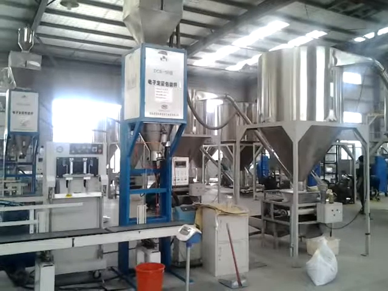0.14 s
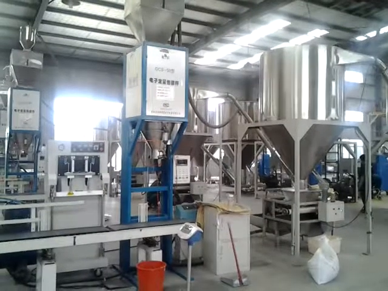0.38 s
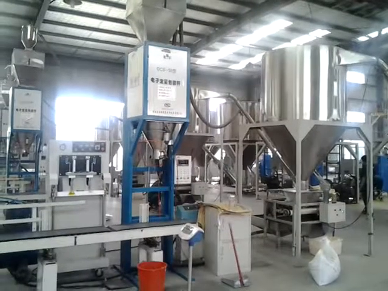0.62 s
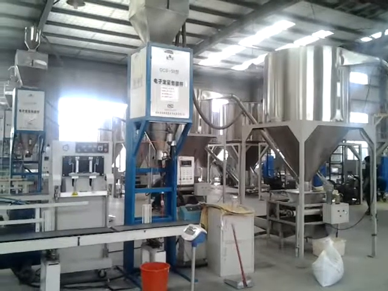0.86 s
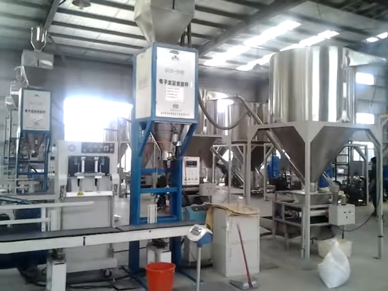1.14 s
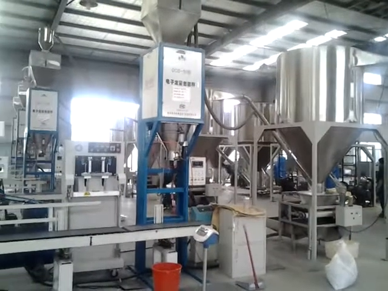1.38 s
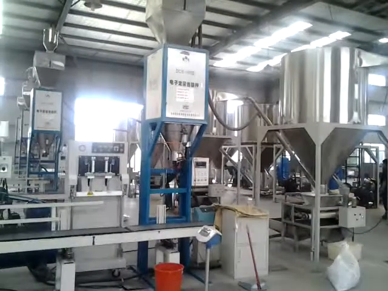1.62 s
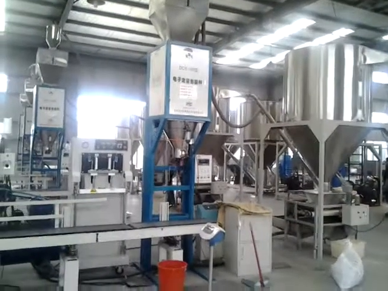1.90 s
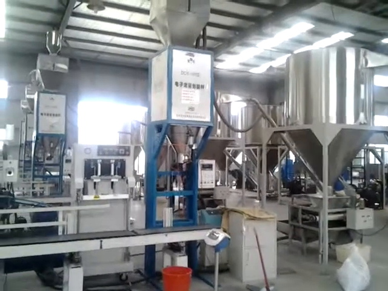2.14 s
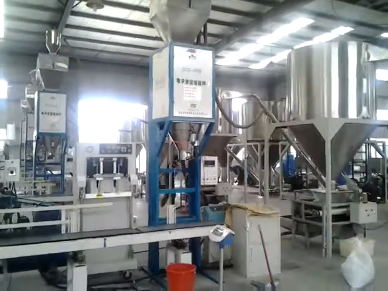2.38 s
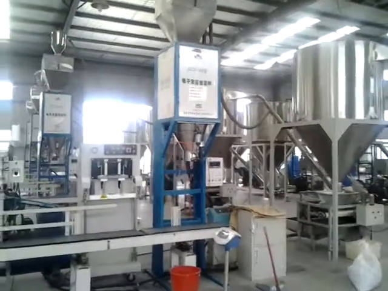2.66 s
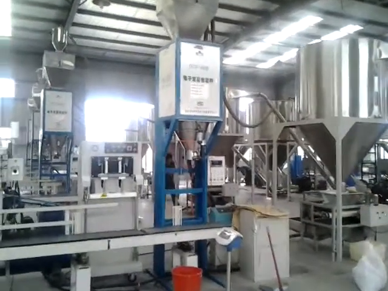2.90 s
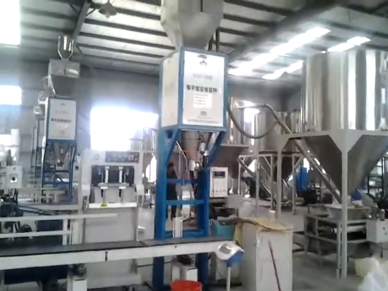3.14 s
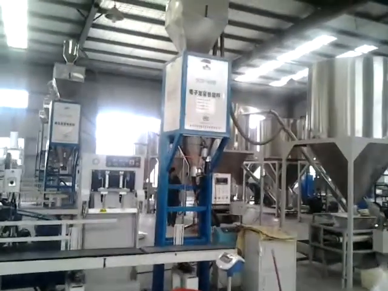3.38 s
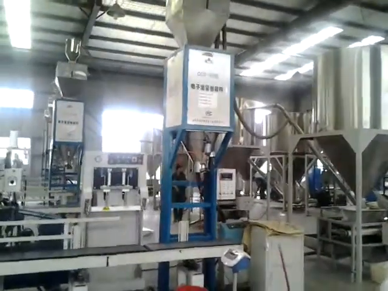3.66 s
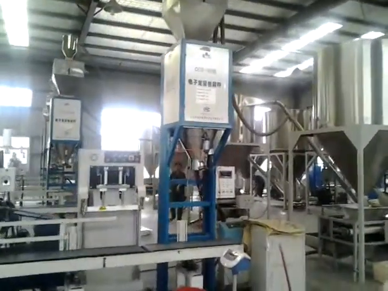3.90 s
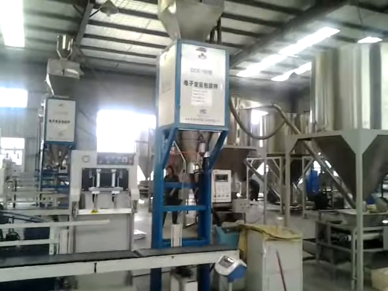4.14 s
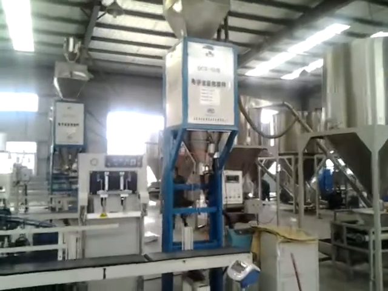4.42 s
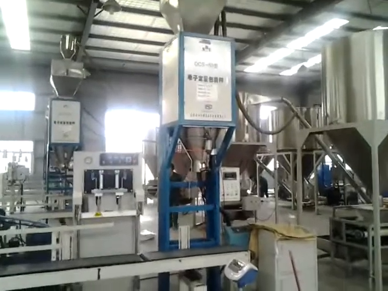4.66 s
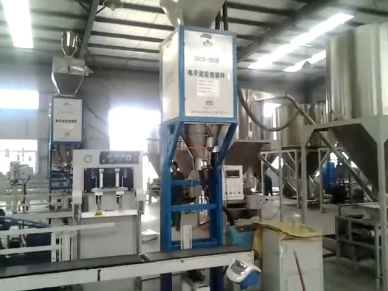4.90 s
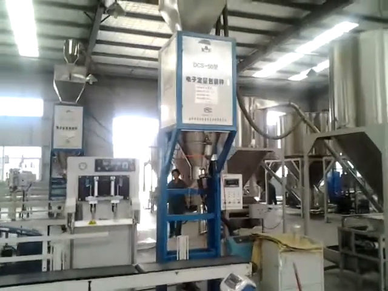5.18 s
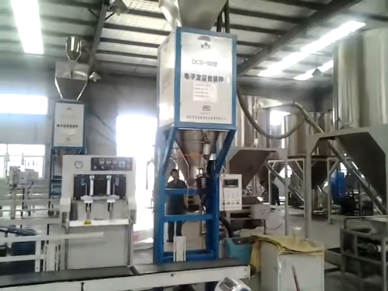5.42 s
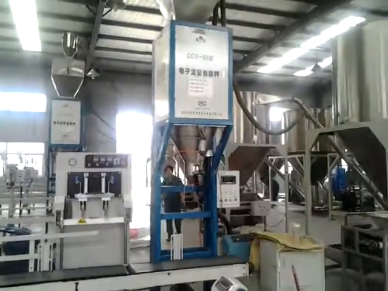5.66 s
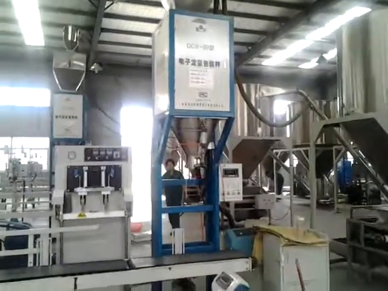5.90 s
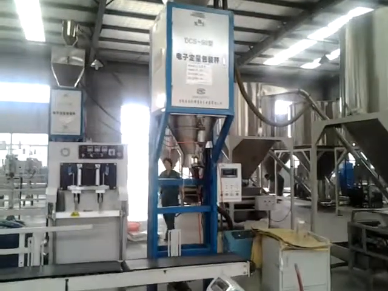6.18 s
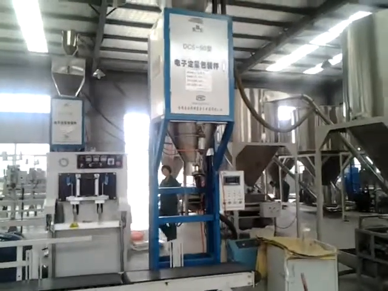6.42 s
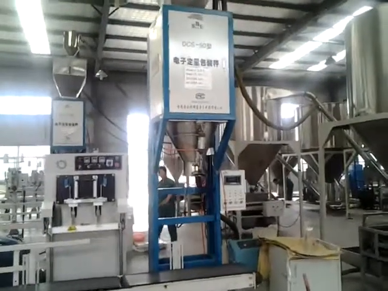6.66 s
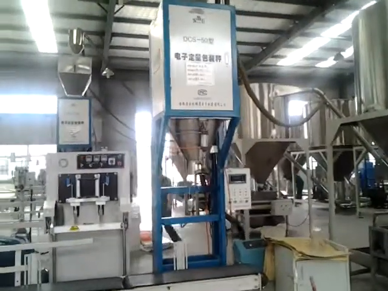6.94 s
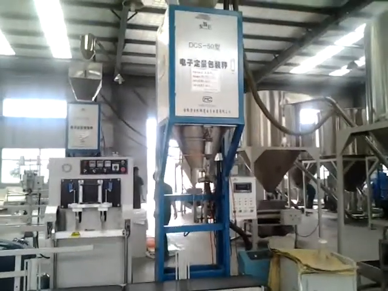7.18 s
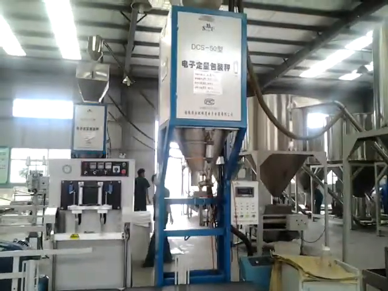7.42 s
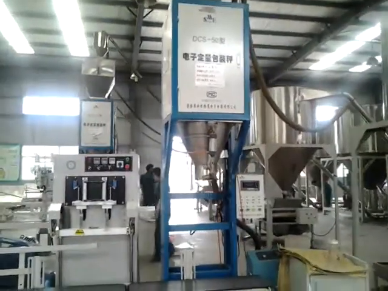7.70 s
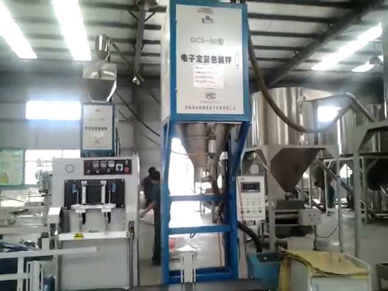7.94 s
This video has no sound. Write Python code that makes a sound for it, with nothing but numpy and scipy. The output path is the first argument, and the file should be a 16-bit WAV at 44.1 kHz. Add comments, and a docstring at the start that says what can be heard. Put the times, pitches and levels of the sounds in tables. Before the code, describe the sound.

Loud factory machinery drones with a rapid thirteen-per-second throb and knock, wavering fan whine, rushing air, brief squeaks and surging din.

```python
"""In a factory hall a reciprocating machine drones: each shaft turn repeats much the same throb and knock.
The machine is one waveform per turn built from overtones, which the hall recolours as the listener walks 2 m.
Around it are shaped noise for the rush of air, a wavering fan tone, clean whistles, squeaks and ticks.
The whole din surges now and then. A small recorder starts late, overloads into flat tops,
skips once and keeps little above 8 kHz."""
import sys
import numpy as np
from scipy import signal
from scipy.fft import rfft, irfft
from scipy.io import wavfile
from scipy.ndimage import uniform_filter1d, map_coordinates

SR = 44100
rng = np.random.default_rng(int(sys.argv[2]) if len(sys.argv) > 2 else 0)


def wav_record(signal):
    """Record a signal, one row per channel, as 16-bit PCM in the file named by sys.argv[1]."""
    frames = np.transpose(np.atleast_2d(signal))
    bounded = np.clip(frames, -1, 1)
    # unit amplitude maps onto the largest positive 16-bit level
    quanta = np.round(bounded * 32767).astype(np.int16)
    wavfile.write(sys.argv[1], SR, quanta)


def boost_factor(decibels):
    """Convert a level in decibels to a linear amplitude factor."""
    exponent = np.asarray(decibels, float) / 20
    return 10 ** exponent


N = 355446

SHAFT_HZ = 12.864
START_S, SKIP_S, SKIPPED = .1537, 4.2361, 1024  # late start and skip in s, samples lost in the skip
T = np.arange(N) / SR
TURNS = SHAFT_HZ * T
HEARD = T + SKIPPED / SR * (T < SKIP_S - SKIPPED / SR / 2)  # time as heard, with the skip


def evened(x):
    """Scales to rms 1."""
    return x / np.sqrt(np.mean(x ** 2) + 1e-20)


def smooth(x, size, axis=-1):
    """Two running means in a row."""
    return uniform_filter1d(uniform_filter1d(x, size=size, axis=axis), size=size, axis=axis)


def read(points, hz):
    """A spectrum table on a log-frequency axis."""
    f, value = np.transpose(points)
    return np.interp(np.log(hz + 1), np.log(f + 1), value)


def curve(rows):
    """Each column of a table in heard time, joined by straight lines."""
    s, *columns = np.transpose(rows)
    return [np.interp(HEARD, s, c) for c in columns]


def noise(spectrum, patchy_db):
    """Random short-time spectra whose level drifts in patches of time and frequency."""
    hz = np.fft.rfftfreq(1024, 1 / SR)
    a, b, patches = rng.standard_normal((N // 256 + 5, len(hz), 3)).T
    patches = uniform_filter1d(patches, size=10, axis=0)
    patches = evened(uniform_filter1d(patches, size=12, axis=1))
    z = (a + 1j * b) * boost_factor(read(spectrum, hz)[:, None] + patchy_db * patches)
    return evened(signal.istft(z, nperseg=1024, noverlap=768)[1][:N])


def blow(at_turn, rise_s, fall_s, per_turn=1):
    """An envelope of rms 1 that opens at a fixed angle of the shaft and dies away."""
    since_s = (TURNS - at_turn) * per_turn % 1 / (SHAFT_HZ * per_turn)
    return evened((1 - np.exp(-since_s / rise_s)) * np.exp(-since_s / fall_s))


def ring(x, hz, width):
    """One resonance of gain 1: shifts its frequency to zero, smooths, and shifts back."""
    turn, r = np.exp(2j * np.pi * hz * T), np.exp(-np.pi * width / SR)
    return 2 * (turn * signal.lfilter([1 - r], [1, -r], x / turn)).real


# Rush of air and far machines. Each row: frequency in Hz, relative density in dB per Hz.
AIR_SPECTRUM = [(71, -49.5), (120, -20.5), (214, -8.5), (594, -7.5), (672, -1.5), (759, -7.5), (954, -6.5),
                (1430, -24), (2030, -21), (3690, -24.5), (5250, -31.5), (7460, -34), (8000, -34),
                (10400, -74.5), (17600, -120)]


def air():
    """Broadband flow noise with a drifting colour."""
    return boost_factor(-3) * noise(AIR_SPECTRUM, patchy_db=1.)


def thin():
    """A thin high tone, its pitch wandering at random, chirps twice a turn."""
    wander_hz = 40 * evened(smooth(rng.standard_normal(N), 900))
    tone = np.sin(2 * np.pi * np.cumsum(7580 + wander_hz) / SR)
    return boost_factor(-50) * tone * blow(0.8, 0.0029, 0.0037, per_turn=2)


# Stray metal ticks. Each row: start in seconds, level in dB, frequency in Hz.
STRAY_TICKS = [(5.283, -27, 3610), (5.345, -27, 3550), (7.244, -29, 6040), (7.327, -29, 6010),
               (7.753, -27, 3590), (7.789, -26, 6070)]
# A loose part ticks once a turn for a while: turn numbers, shaft angle in turns, level in dB, Hz.
LOOSE_TURNS, LOOSE_ANGLE = range(94, 101), .025
LOOSE_DB, LOOSE_HZ = -22, 3690


def ticks():
    """Small metal parts tap and ring briefly: sines with a 1 ms rise that lose 60 dB in 68 ms."""
    loose = [((k + LOOSE_ANGLE) / SHAFT_HZ, LOOSE_DB, LOOSE_HZ) for k in LOOSE_TURNS]
    out = np.zeros(N)
    for s, db, hz in STRAY_TICKS + loose:
        since_s = np.maximum(T - s, 0)
        envelope = boost_factor(db - 60 * since_s / 0.068) * (1 - np.exp(-since_s / .001))
        out += envelope * np.sin(2 * np.pi * hz * since_s)
    return out


# Short metal squeaks. Each row: start in seconds, length in seconds, frequency in Hz, level in dB.
METAL_SQUEAKS = [(0.783, 0.042, 2030, -27), (1.956, 0.054, 1646, -31), (2.884, .09, 1610, -23.5),
                 (2.94, 0.087, 2050, -26)]


def squeaks():
    """Brief pure tones that rise quickly, hold and fade."""
    out = np.zeros(N)
    for s, length, hz, db in METAL_SQUEAKS:
        u = np.clip((HEARD - s) / length, 0, 1)
        envelope = np.minimum(2 * np.sin(np.pi * u), 1) * (u < 1)
        out += np.sqrt(2) * boost_factor(db) * envelope * np.sin(2 * np.pi * hz * T)
    return out


# The drifting fan whine. Each row: time in seconds, centre frequency in Hz, level in dB against the din.
WHINE_DRIFT = [(.2, 675, -8), (1.2, 676, -10), (1.7, 674.8, -8), (2.8, 676.2, -8), (3.5, 672.4, -7.5),
               (4., 670, -7), (4.5, 671.9, -9), (5., 666, -4), (5.5, 672, -8), (6.2, 670.5, -3),
               (6.55, 673, -9), (7., 674.5, -5), (8.05, 675.6, -9)]
HUNT_PER_S, HUNT_HZ, HUNT_DB, HUNT_START = 5.0, 9.3, 2, .3  # rate, pitch and level swing, start in radians
THROB_DB = 1.5  # rms


def whine():
    """The fan tone hunts with its belt in pitch and level, throbs and is roughened by turbulent flow."""
    a, b = smooth(rng.standard_normal((N, 2)), 900, axis=0).T
    rough = 1 + .8 * (evened(a) + 1j * evened(b))
    throb = evened(sum(np.sin(2 * np.pi * (f * T + rng.random())) / np.sqrt(f)
                       for f in np.geomspace(2, 12, num=24)))
    centre_hz, level_db = curve(WHINE_DRIFT)
    hunt = 2 * np.pi * HUNT_PER_S * T + HUNT_START
    phase = 2 * np.pi * np.cumsum(centre_hz + HUNT_HZ * np.sin(hunt)) / SR
    tone = evened((rough * np.exp(1j * phase)).real)
    swell_db = THROB_DB * throb + HUNT_DB * np.sin(hunt + 1.5)
    return boost_factor(level_db) * evened(boost_factor(swell_db) * tone)


# The four overtones that stand out as clean whistles: multiples of the shaft rate.
WHISTLE_ORDERS = [25, 55, 64, 206]
# Each row: time in seconds, then the level of each whistle in dB against the din.
WHISTLE_LEVELS = [(.2, -18.5, -13, -10, -29), (.45, -14, -10, -6, -34), (.72, -18, -14.5, -18, -32),
                  (1.1, -25, -10.5, -10.5, -32), (1.8, -17.5, -12.5, -10, -26),
                  (2.7, -13, -12, -13.5, -24.5), (3.15, -14, -10.5, -10.5, -31), (3.8, -24, -16, -8, -40),
                  (4.1, -22.5, -9.5, -19, -38), (4.6, -15, -12.5, -10, -35),
                  (5.5, -14.5, -13.5, -19, -36.5), (6.2, -21, -11.5, -15, -38.5),
                  (7.1, -12.5, -12.5, -29, -33), (8.05, -18.5, -12.5, -23.5, -38.5)]


def whistles():
    """Clean overtones of the shaft, sines locked to its turning."""
    return sum(np.sqrt(2) * boost_factor(level_db) * np.sin(2 * np.pi * (order * TURNS + rng.random()))
               for order, level_db in zip(WHISTLE_ORDERS, curve(WHISTLE_LEVELS)))


# The listener stands nearly still, then walks. Each row: time in seconds, distance walked in metres.
WALKED = [(0, 0), (3, .35), (8.06, 2)]


def repeating(gain, steady):
    """One waveform per turn; its overtones keep a steady share and drift in the rest along the walk."""
    moments, size = 81, 16384  # places along the walk, points per turn
    a, b = rng.standard_normal((moments + 1, len(gain), 2)).T
    z = a + 1j * b
    drift = smooth(z[:, 1:], 6, axis=1)
    drift /= abs(drift) ** .4  # evens out the fades
    drift /= np.sqrt(np.mean(abs(drift) ** 2))
    fixed = z[:, :1] / abs(z[:, :1])
    z = np.sqrt(steady) * fixed + np.sqrt(1 - steady) * drift
    turn = irfft(z * gain[:, None], size, axis=0) * size / np.sqrt(2)
    turn = np.vstack([turn, turn[:1]])
    place = curve(WALKED)[0] / WALKED[-1][1] * (moments - 1)
    return map_coordinates(turn, [TURNS % 1 * size, place], order=1, mode="nearest")


# General colour of the shaft's overtones. Each row: frequency in Hz, relative level in dB per overtone.
DRONE_COLOUR = [(60, -80.5), (110, -49), (140, -46.5), (220, -36.5), (330, -38), (500, -39), (700, -41),
                (950, -41.5), (1200, -43), (1450, -51.5), (2200, -49.5), (3000, -64), (4000, -69)]
# Overtones that casing and pipes favour. Each row: multiple of the shaft rate, lift in dB.
CASING_LIFTS = [(11, 3), (17, 2), (21, 2), (24, 4), (34, 3), (39, 3), (41, 4), (43, 3), (45, 4), (47, 3),
                (48, 5), (50, 5), (51, 4), (54, 3), (63, 2), (74, 3), (90, 3), (91, 3)]


def drone():
    """All overtones of the shaft, with the direct thump and slam of each stroke."""
    gain_db = read(DRONE_COLOUR, SHAFT_HZ * np.arange(320))
    order, lift_db = np.transpose(CASING_LIFTS)
    gain_db[order] += lift_db
    gain_db[[0] + WHISTLE_ORDERS] = -99  # leaves room for the whistles
    thump = blow(.68, .002, .004) * np.sin(2 * np.pi * 8 * (TURNS - .68))
    slam = -blow(.925, .0004, .0014) * np.sin(2 * np.pi * 750 * ((TURNS - .925) % 1) / SHAFT_HZ)
    overtones = evened(repeating(boost_factor(gain_db), steady=.25))
    return overtones + boost_factor(-25.0) * evened(thump) + boost_factor(-9.5) * evened(slam)


# The knock of each turn. Each row: frequency in Hz, relative level in dB.
KNOCK_SPECTRUM = [(800, -27), (1300, 7), (2000, -6.5), (2700, 0), (3600, -9), (4200, -11.5), (6000, -27.5)]
# What the knock rings. Each row: frequency in Hz, width in Hz, level in dB against the hit.
CASING_RINGS = [(1610, 22, -25.5), (2050, 71, -10), (2620, 28, -16), (3540, 82, -15.5)]


def knock():
    """A sharp rattle once a turn, mostly alike from turn to turn, rings the casing."""
    gain = boost_factor(read(KNOCK_SPECTRUM, SHAFT_HZ * np.arange(520)))
    alike = evened(repeating(gain, steady=.2))
    gate = blow(.92, .005, .004) + .5 * blow(.93, .004, .02)
    hit = evened(gate * (.9 * alike + .35 * noise(KNOCK_SPECTRUM, patchy_db=1.)))
    return hit + sum(boost_factor(db) * evened(ring(hit, hz, width)) for hz, width, db in CASING_RINGS)


# The 170-570 Hz body, fuller as the listener moves in. Each row: time in seconds, band gain in dB.
BODY_GAIN = [(.2, -2), (1.5, -1.4), (2.5, -1.7), (3.3, 1.2), (4.3, 0.1), (5.1, 1.3), (6.3, 0.4), (7.2, 0.3),
             (8.05, 0.3)]


def with_body(x):
    """Raises or lowers the low-middle band along its curve."""
    band = signal.sosfiltfilt(signal.butter(2, (170, 570), "band", fs=SR, output="sos"), x)
    return x + (boost_factor(curve(BODY_GAIN)[0]) - 1) * band


# The hall creeps up as the listener nears. Each row: time in seconds, steady gain of the din in dB.
HALL_GAIN = [(.2, -17.5), (.8, -16), (1.9, -17.5), (2.7, -17), (3.8, -17), (5.0, -16), (6.0, -16.5),
             (6.6, -15), (8.05, -15.5)]
# The din surges and settles. Each row: start in seconds, rise in seconds, lift in dB, settling in seconds.
DIN_SURGES = [(.84, 0.16, 6.5, 0.44), (2.85, 0.11, 7, .35), (6.64, 0.081, 4.5, 0.29), (6.95, 0.56, 5, 0.39)]


def loudness_db():
    """The steady hall plus each surge: a straight rise, then an exponential settling."""
    total_db = curve(HALL_GAIN)[0]
    for s, rise, db, settle in DIN_SURGES:
        settling = np.exp(-np.maximum(HEARD - s - rise, 0) / settle)
        total_db = total_db + db * np.clip((HEARD - s) / rise, 0, 1) * settling
    return total_db


def scene():
    """All machines swell together; squeaks, ticks and the thin tone keep their own level."""
    knock_db = -19.5 + 1.1 * curve(WALKED)[0]  # grows per metre as the listener nears the machine
    machine = air() + boost_factor(knock_db) * knock() + boost_factor(-2.5) * drone()
    din = with_body(machine) + whistles() + whine()
    return (boost_factor(loudness_db()) * din + thin() + squeaks() + ticks())[None]


def low_pass(x):
    """Removes everything above the highest recorded frequency."""
    return signal.sosfilt(signal.butter(12, 9010, fs=SR, output="sos"), x)


def record(dry):
    """A bass cut, hard overload, a 16 kHz converter leaking a mirror image, a late start and one skip."""
    dry = signal.sosfilt(signal.butter(1, 90, "high", fs=SR, output="sos"), dry)
    x = np.clip(dry, -.345, .345)
    hz = np.fft.rfftfreq(N, 1 / SR)
    # the converter's low-pass; rows: frequency in Hz, gain in dB
    below = read([(7640, 0), (7720, -2.5), (8000, -13.0), (8300, -74.5)], hz)
    x = irfft(rfft(x) * boost_factor(below), N)
    # the mirror image leaks around and above 8 kHz
    mirror = rfft(2 * x * np.cos(2 * np.pi * 16000 * T))
    leak = read([(7700, -63.5), (8000, -11.5), (8350, -9.5), (8700, -22.0), (9150, -55.5), (9400, -87)], hz)
    x = x + irfft(mirror * boost_factor(leak) * (hz < SR / 4), N)
    cut = round(SKIP_S * SR)
    x = np.hstack([np.zeros((1, SKIPPED)), x[:, :cut - SKIPPED], x[:, cut:]])
    return low_pass(x * (T > START_S))


dry = scene()
out = record(dry)
wav_record(out)
```